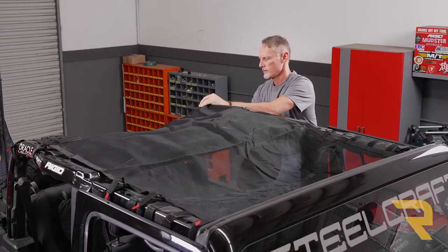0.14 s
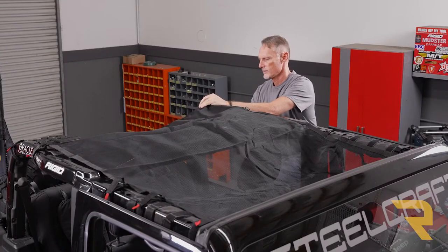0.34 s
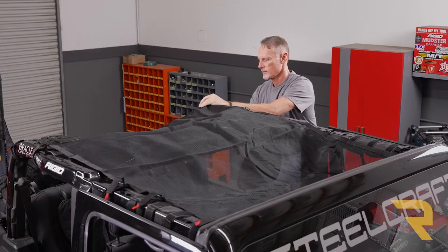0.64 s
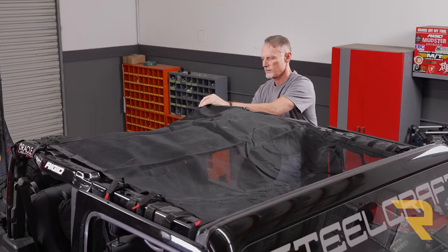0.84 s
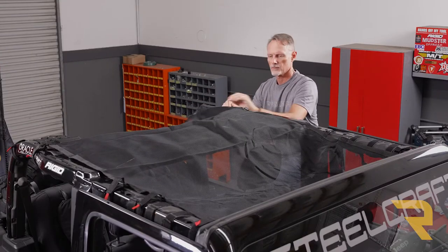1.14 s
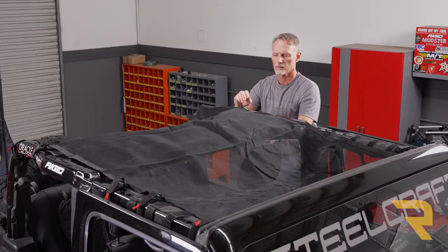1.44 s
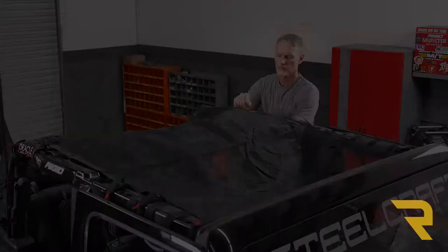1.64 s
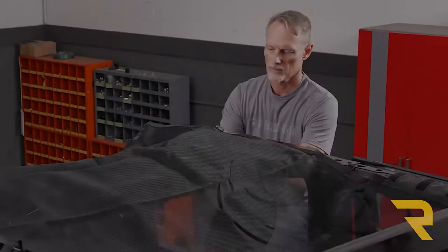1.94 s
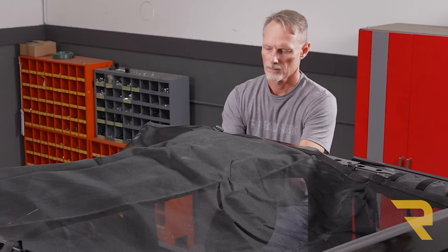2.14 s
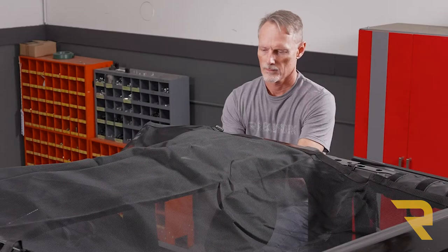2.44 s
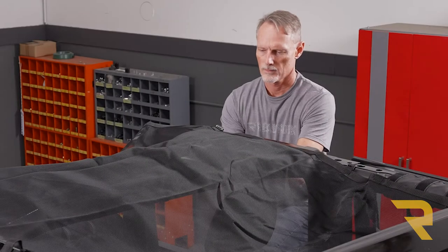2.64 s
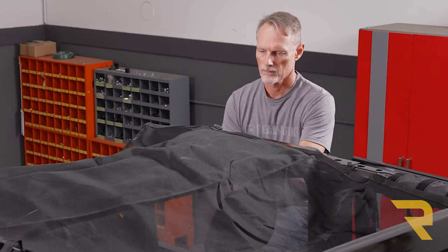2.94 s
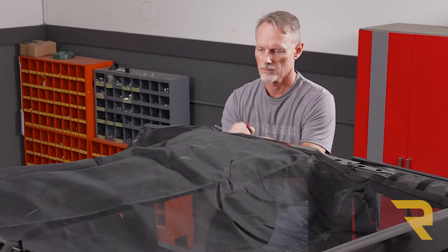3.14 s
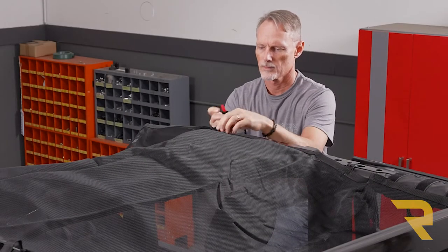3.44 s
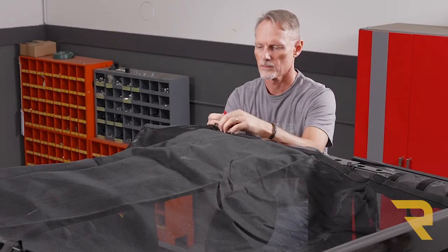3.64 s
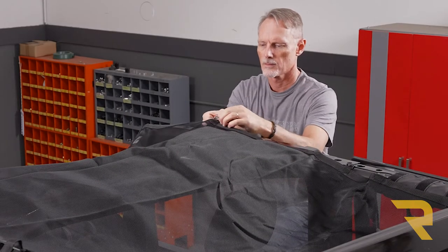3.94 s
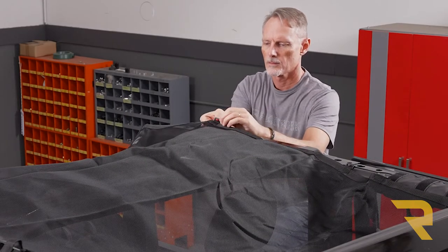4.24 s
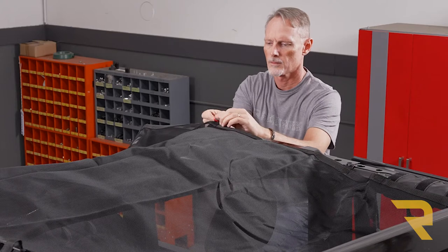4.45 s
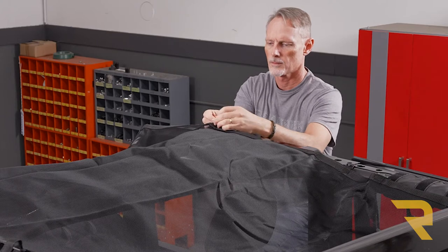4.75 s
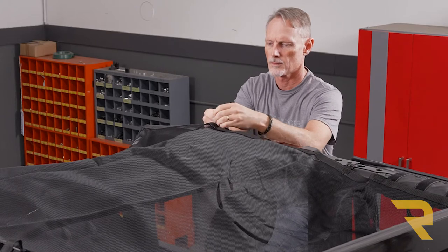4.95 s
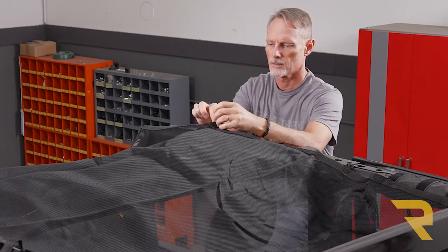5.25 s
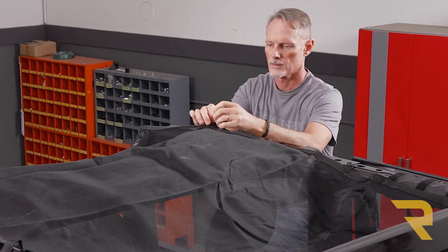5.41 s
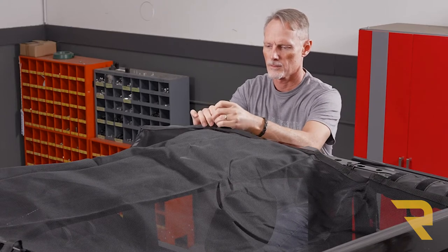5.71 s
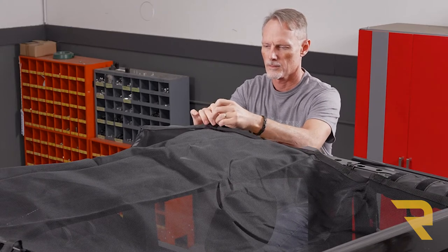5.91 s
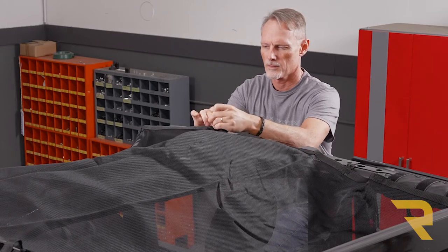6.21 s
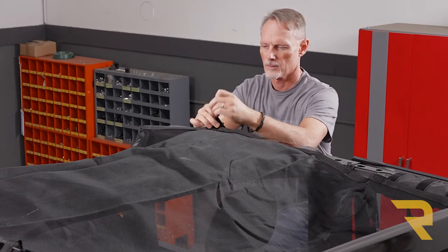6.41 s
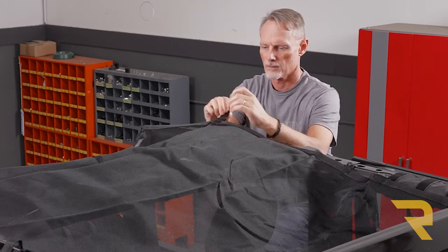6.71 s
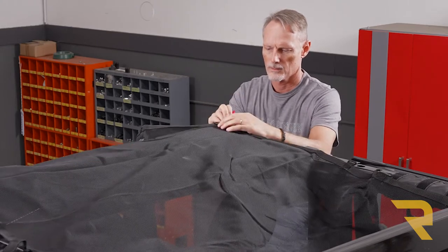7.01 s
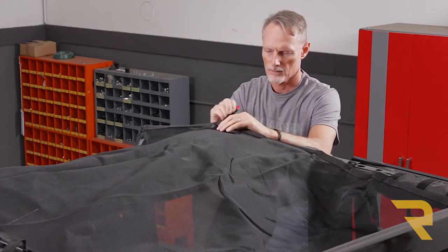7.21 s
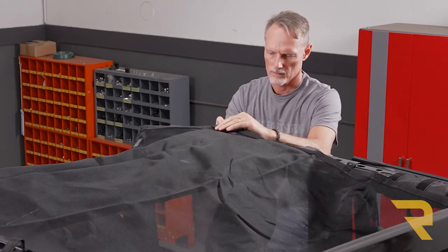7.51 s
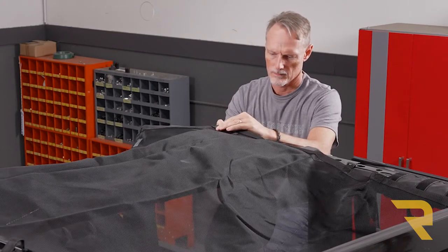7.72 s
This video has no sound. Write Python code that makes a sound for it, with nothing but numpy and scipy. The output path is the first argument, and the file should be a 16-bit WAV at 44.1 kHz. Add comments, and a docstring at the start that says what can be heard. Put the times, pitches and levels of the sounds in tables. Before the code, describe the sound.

A quiet workshop heard close in mono, with a faint low hum, still air and soft low lumps of body movement. From 0.1 to 0.6 seconds, light hook-and-loop crackles and bright little snaps mix with brushing cloth; scattered ticks and small tears continue to about 1.3. Around 1.7 to 2.2, fabric rubs and soft dull knocks sound on a hollow panel. Ticks quicken at 2.6, then the loudest event, a harsh, dense, bright rip, runs from about 2.68 to 2.83, trailing into strong cloth rustle. Short, lighter rasps follow at 3.35 and 3.65. From 4 to 6 it is sparse: faint rubbing, ticks and tiny fingertip taps. A sharp crackling snap comes at 6.24, with more handling and a muted bump near 6.85. Another crisp rip, weaker than the main one, hits at 7.23 to 7.31, then fine ticks fade out by 7.85.

```python
"""A quiet workshop, where hook-and-loop straps are ripped open by hand on a vinyl cover.
Each hook that lets go snaps at its own pitch; a rip is a dense hail of tiny snaps that tugs the cover.
Cloth rustles as fine rubbing grains and a dull wash; soft blows ring the modes of a hollow panel.
Fingertips tap stiff parts of the strap, and the shop hums faintly under low lumps of movement.
The sound is close, in one channel, with two kinds of room sound: a near echo and a faint short tail."""
import sys
import numpy as np
from scipy import signal
from scipy.io import wavfile
from scipy.ndimage import uniform_filter1d

SR = 44100
rng = np.random.default_rng(int(sys.argv[2]) if len(sys.argv) > 2 else 0)


def materialize(psi):
    """Save the field psi as 16-bit PCM at rate SR to the path in sys.argv[1].

    A 1-D psi becomes a single channel; in a 2-D psi each row is a channel.
    """
    bounded = np.clip(np.atleast_2d(psi).T, -1, 1)
    quanta = np.round(bounded * 32767).astype(np.int16)
    wavfile.write(sys.argv[1], SR, quanta)


N = 347067  # length in samples
TIME = np.arange(N) / SR  # seconds

# Colour of lightly released hooks. Each row: frequency in Hz, relative strength in dB per Hz.
STRAP_COLOUR = [(1500, -22), (2500, -10.5), (4200, -6.5), (6500, -5.5), (10000, -5), (14500, -4),
                (16200, -9.5)]


def gain_of(db):
    """Turns decibels into a plain multiplier for the sound wave."""
    return 10 ** (np.asarray(db) / 20)


def evened(x):
    """Scales a signal to an average power of 1."""
    return x / np.sqrt(np.mean(x ** 2) + 1e-20)


def add(mix, s, sound):
    """Adds a sound to the mix, starting at s seconds and cut where the mix ends."""
    part = mix[round(s * SR):][:len(sound)]
    part += sound[:len(part)]


def colour(x, points, size=8192):
    """Filters without looking ahead, to the given spectrum; white noise keeps its power."""
    f, db = np.transpose(points)
    hz = abs(np.fft.fftfreq(size, 1 / SR))
    log_gain = np.log(gain_of(np.interp(np.log(hz + 1), np.log(f + 1), db)))
    # the phase that goes with this spectrum puts the response as early as possible
    spectrum = np.exp(np.conj(signal.hilbert(log_gain)))
    response = np.fft.ifft(spectrum).real[:size // 2]
    return signal.oaconvolve(x, response / np.linalg.norm(response))[:len(x)]


def drift(seconds):
    """Makes a smooth random wander of power 1 that changes over the given time."""
    width = max(round(seconds * SR), 1)
    once = uniform_filter1d(rng.standard_normal(N), width)
    return evened(uniform_filter1d(once, width))


def hail(per_s, spread_db, clump_db, clump_s, ring_s, count=16):
    """Random tiny snaps in clumps, each ringing briefly at one of several pitches; power 1."""
    size_db = spread_db * np.minimum(rng.exponential(1, N), 3) + clump_db * drift(clump_s)
    size = gain_of(size_db) * (rng.random(N) < per_s / SR)
    kind = rng.integers(0, count, N)
    t = np.arange(256) / SR
    out = np.zeros(N)
    for k, hz in enumerate(np.geomspace(2500, 15500, count)):
        grain = np.exp(-t / ring_s) * (np.cos(2 * np.pi * hz * t) + 0.79 * rng.standard_normal(256))
        out += signal.oaconvolve(size * (kind == k), -grain)[:N]
    return evened(out), evened(size)


def swells(rows, rest_db):
    """Each movement speeds up, holds and slows again; the gains add over a resting level."""
    ends_db, fall_bend = -20, 0.49  # level one rise or fall time away; how the fall curves
    out = np.full(N, gain_of(rest_db))
    for s, rise_s, hold_s, fall_s, db in rows:
        first = max(round((s - 2 * rise_s) * SR), 0)
        near = slice(first, round((s + hold_s + 2 * fall_s) * SR))
        t = TIME[near] - s
        before = np.maximum(-t / rise_s, 0)
        after = np.maximum((t - hold_s) / fall_s, 0) ** fall_bend
        out[near] += gain_of(db + ends_db * (before + after))
    return out


def background():
    """Still air of the shop as coloured noise, a wavering hum and low lumps of movement."""
    # Colour of the still air. Each row: frequency in Hz, relative strength in dB per Hz.
    air_colour = [(20, -17.5), (60, 2), (124, 0.5), (211, -4), (474, -12.5), (531, -29), (1230, -25),
                  (2150, -23.5), (10900, -27.5), (14100, -36), (16200, -43)]
    # Tones of the hum. Each row: frequency in Hz, level in dB around which it wavers.
    hum_tones = [(118.4, -68.5), (258.4, -76.5)]
    # Arms and body moving near the microphone. Each row: time in seconds, level in dB before wavering.
    bumps = [(.16, -53), (.45, -55.5), (1., -57), (1.23, -58), (1.42, -58), (1.75, -64.5), (2.73, -47.5),
             (2.95, -58), (3.55, -62.5), (3.97, -58.5), (5.2, -61), (6.25, -50.5), (6.6, -60),
             (6.77, -53.5), (7.25, -45), (7.55, -59)]
    rise_s, hold_s, fall_s, still_db = 0.11, 0.0069, 0.2, -73.5  # shape of each bump, level between them

    air = gain_of(-64.5) * colour(rng.standard_normal(N), air_colour)
    hum = np.zeros(N)
    for hz, db in hum_tones:
        level = gain_of(db + 4.1 * drift(0.18))
        hum += level * np.sin(2 * np.pi * hz * TIME + 1.0 * drift(0.036))
    low_colour = [(10, -10.5), (25, -6.0), (70, -1.5), (140, -9), (400, -59.5)]  # Hz, dB per Hz
    lumps = colour(rng.standard_normal(N), low_colour)
    movement = swells([(s, rise_s, hold_s, fall_s, db) for s, db in bumps], still_db)
    return air + hum + lumps * movement * gain_of(0.93 * drift(0.04))


def rustle():
    """Fibres rub: very dense fine grains whose colour wanders with the fold, and a duller wash."""
    # Colour of the rubbing cloth. Each row: frequency in Hz, relative strength in dB per Hz.
    cloth_colour = [(880, -59), (1500, -29.5), (1890, -19.5), (2260, -14.5), (4350, -10), (6420, -8),
                    (9180, -5.5), (14800, -6.5), (16200, -10.5)]
    # Colour of the shifting folds. Each row: frequency in Hz, relative strength in dB per Hz.
    fold_colour = [(150, -19), (400, 1), (1200, -3.5), (3000, -15), (5000, -35.5)]
    # Dull wash of folds shifting in the cover. Each row: time in seconds, level in dB before wavering.
    shifting = [(0.0, -69), (1.62, -67.5), (1.92, -64), (2.532, -67.5), (2.953, -60), (3.464, -71),
                (4.214, -69.5), (5.23, -67), (5.952, -71), (6.258, -64), (6.483, -67.5), (6.74, -65),
                (6.86, -56), (7.108, -69.5), (7.307, -58.5), (7.868, -74.5)]
    # Hand strokes over the cloth. Each row: start of full speed in seconds, rise in seconds,
    # hold in seconds, fall in seconds, level in dB.
    strokes = [(.03, .06, 0.0058, 0.037, -62.5), (.1, 0.03, 0.082, 0.11, -55.5),
               (.3, 0.089, 0.023, 0.047, -74), (.565, 0.013, 0.035, 0.1, -55.5),
               (.79, 0.28, 0.013, 0.26, -64), (1.16, 0.27, 0.11, 0.11, -60),
               (1.685, 0.0068, 0.07, 0.063, -61.5), (1.8, 0.036, 0.061, 0.11, -56),
               (2.09, 0.096, 0.068, 0.1, -58.5), (2.22, .06, 0.034, 0.028, -57),
               (2.39, 0.038, 0.085, 0.065, -54.5), (2.53, 0.087, 0.15, 0.16, -70),
               (2.82, 0.19, 0.13, 0.29, -45), (3.1, 0.14, 0.056, 0.22, -62),
               (3.535, 0.015, 0.036, 0.064, -48), (3.6, 0.024, 0.028, 0.012, -60),
               (3.33, 0.025, 0.064, 0.018, -52), (3.77, 0.036, 0.12, 0.085, -62),
               (4.43, 0.08, 0.15, 0.092, -66), (4.86, 0.03, 0.011, 0.04, -63.5),
               (5.02, 0.014, 0.012, 0.072, -50.5), (5.17, 0.12, 0.035, 0.17, -61),
               (5.365, 0.01, 0.0094, 0.014, -62), (5.53, 0.043, 0.084, 0.06, -62),
               (5.68, 0.023, 0.021, .06, -68.5), (5.82, 0.057, 0.024, 0.027, -60.5),
               (6.072, 0.0087, 0.0096, 0.026, -53), (6.3, 0.16, 0.11, 0.23, -57),
               (6.58, 0.0074, 0.064, 0.19, -58.5), (6.76, 0.015, 0.025, 0.14, -59.5),
               (6.88, 0.092, 0.063, 0.27, -60.5), (7.05, .06, 0.013, 0.044, -64),
               (7.3, 0.12, 0.082, 0.27, -56), (7.48, 0.065, 0.027, 0.13, -65)]
    resting_db = -75

    fine = hail(per_s=20000, spread_db=1.5, clump_db=.8, clump_s=.004, ring_s=.0004)[0]
    # stray hooks catching
    ticks = hail(per_s=220, spread_db=3.2, clump_db=2.5, clump_s=0.04, ring_s=.0006)[0]

    # random patches in time and pitch make the colour wander
    z = signal.stft(colour(fine, cloth_colour), nperseg=256)[2]
    patches = rng.standard_normal(z.shape[::-1]).T
    for _ in range(2):
        patches = uniform_filter1d(patches, size=6, axis=0)
        patches = uniform_filter1d(patches, size=30, axis=1)
    fine = signal.istft(z * gain_of(2.2 * evened(patches)), nperseg=256)[1][:N]

    wash_db = 0.47 * drift(0.0058) + np.interp(TIME, *np.transpose(shifting))
    dull = colour(rng.standard_normal(N), fold_colour) * gain_of(wash_db)
    rubbing = evened(fine) + gain_of(-2.5) * evened(colour(ticks, STRAP_COLOUR))
    return swells(strokes, resting_db) * rubbing + dull


def slips():
    """The peel sticks and slips: hooks give way in uneven jerks, sudden and dying fast; power 1."""
    slips_per_s, slip_s, spread_db = 250, 0.001, 2  # rate before it wanders, fade time, size spread
    pace = gain_of(4.0 * drift(.003))
    jerks = np.diff(np.floor(np.cumsum(pace) * slips_per_s / SR), prepend=0)
    sizes = gain_of(spread_db * np.minimum(rng.standard_normal(N), 1))
    return evened(signal.lfilter([1], [1, -np.exp(-1 / (slip_s * SR))], jerks * sizes))


def rips():
    """Rows of hooks tear loose: bright hail, and each release tugs the cover."""
    # One list for each rip. Each row: time in seconds, pull level in dB,
    # share in the cover's low body in dB against the pull.
    rip_curves = [
        [(0.08, -61, -15), (0.102, -44, -11), (0.112, -61, -6), (0.21, -46, -24)],
        [(0.499, -49, -16), (0.541, -67, -2), (0.659, -76, 5)],
        [(2.6935, -21.5, -11), (2.717, -14, -11), (2.7215, -26, -17), (2.727, -18.5, -2.5), (2.7305, -28, -16),
         (2.738, -19.5, -17), (2.746, -17.5, -12), (2.766, -17, -14.5), (2.783, -12.5, -19),
         (2.798, -16.5, -10), (2.806, -16.5, -8.5), (2.814, -19, -14.5), (2.822, -38, -29)],
        [(3.308, -62, -19), (3.352, -34.5, -24), (3.392, -41.5, -33), (3.398, -55.5, -8)],
        [(3.605, -56, -26), (3.64, -38.5, -31), (3.657, -51, -13)],
        [(6.228, -62, 9), (6.236, -19, -19), (6.242, -23, -21), (6.306, -43.5, -8), (6.316, -59, -2),
         (6.35, -52, -11)],
        [(6.844, -57, 7), (6.852, -38, -16), (6.928, -58, -16)],
        [(7.224, -68, -15), (7.236, -50, -8), (7.273, -23, -11.5), (7.284, -29, -9), (7.297, -26.5, -18.5),
         (7.327, -50.5, -5), (7.363, -42, -59)],
    ]
    # Short tears of a few hooks at once. Each row: start in seconds, level in dB, fade length in seconds.
    tears = [(0.0993, -30.5, 0.005), (0.127, -38, 0.006), (0.78, -34, 0.0031), (1.179, -41.5, 0.0066),
             (1.219, -44, 0.0063), (1.2272, -32, 0.0048), (2.6875, -12, 0.0017), (2.7115, -20, 0.0022),
             (2.721, -17, 0.0022), (2.7306, -10, 0.0027), (2.766, -22, 0.0025), (2.801, -20, 0.0036),
             (2.808, -14, 0.0022), (2.873, -34, 0.015), (2.9302, -33, 0.015), (3.012, -43.5, 0.015),
             (3.256, -45.5, 0.026), (5.015, -43, 0.026), (5.246, -45, 0.0032), (5.444, -34.5, 0.0014),
             (6.238, -27, 0.0034), (6.2965, -45, 0.0018), (6.303, -25, 0.0036), (6.579, -43.5, 0.011),
             (7.2327, -28.5, 0.0044), (7.245, -34, .004), (7.253, -30, 0.0028), (7.2582, -26, 0.0024),
             (7.271, -24, 0.003), (7.289, -25, .0015), (7.2923, -22, 0.0015), (7.298, -15, 0.0021),
             (7.3077, -24, 0.0026)]
    # Colour of hooks pulled hard. Each row: frequency in Hz, relative strength in dB per Hz.
    hook_colour = [(1180, -51), (2000, -12), (2530, -7), (2810, -13.5), (3320, -1.5), (4250, -3.5),
                   (6870, 0), (10200, 5), (15100, 3.5), (16200, -20)]
    # A light pull frees only the hook tips. Each row: frequency in Hz, relative strength in dB per Hz.
    peel_colour = [(2000, -27.5), (4000, -13), (6000, -5), (12000, -0.5), (16200, -8.5)]
    # Low body of the cover. Each row: frequency in Hz, relative strength in dB per Hz.
    cover_colour = [(53, -44.5), (90, -3), (379, -2.5), (789, 0), (1210, 1), (2700, -7.5), (3900, -40.5)]
    between_hard, between_light = 0.76, 0.28  # steady part of the hail between jerks

    bright, tugs = hail(per_s=5000, spread_db=-1.0, clump_db=1.28, clump_s=0.00069, ring_s=0.0002)
    jerks = slips()
    hard = evened(colour(bright * (between_hard + jerks), hook_colour))
    light = evened(colour(bright * (between_light + jerks), peel_colour))
    low = evened(colour((tugs.mean() - tugs) * (between_hard + jerks), cover_colour))

    pull, tear, body = np.zeros((3, N))
    for rows in rip_curves:
        s, db, low_db = np.transpose(rows)
        t = np.arange(s[0], s[-1], 1 / SR)
        edge = signal.windows.tukey(len(t), .01)  # softens both ends
        add(pull, s[0], edge * gain_of(np.interp(t, s, db)))
        add(body, s[0], edge * gain_of(np.interp(t, s, db + low_db)))
    for s, db, length in tears:
        u = np.arange(round(5 * length * SR)) / SR / length
        burst = gain_of(db) * np.minimum(5 * u, 1) * np.exp(-u ** 2)
        add(tear, s, burst)
        add(body, s, gain_of(-18.5) * burst)

    # only a hard pull shakes the wider strap
    share = np.clip(uniform_filter1d(pull, 900) / gain_of(-23.5), 0, 1)
    pulled = pull * (share * hard + (1 - share) * light)
    torn = tear * evened(colour(bright, peel_colour))
    return pulled + torn + body * low


def strap_ring(x):
    """The taut free end of the strap adds a broad resonance that moves with its free length."""
    # Ring as the strap is pulled and rubbed. Each row: time in seconds, frequency in Hz,
    # level in dB against the direct sound.
    ring_path = [(2.2, 4490, -7), (2.74, 4500, 1), (2.765, 4700, -3), (2.775, 9500, -2), (2.82, 10400, -26),
                 (3.3, 5200, -10), (3.7, 4800, -2), (4.399, 4490, -6.5), (5.05, 4314, -9.5),
                 (7.3, 6760, -1)]
    width_hz = 730
    s, hz, db = np.transpose(ring_path)
    turn = np.exp(2j * np.pi * np.cumsum(np.interp(TIME, s, hz)) / SR)
    r = np.exp(-np.pi * width_hz / SR)
    # shift the moving pitch down to zero, smooth there, and shift back
    smoothed = signal.lfilter([1 - r], [1, -r], x / turn)
    return x + gain_of(np.interp(TIME, s, db)) * 2 * (turn * smoothed).real


def snaps():
    """A hook lets go: a ringing crack, a dying fizz, and a quick flick and slow heave of the cover."""
    # Single hooks letting go. Each row: start in seconds, level in dB before colouring,
    # ring frequency in Hz, tug on the cover in dB against that level.
    snap_rows = [(0.09, -23.5, 7600, -29), (0.1442, -21, 6300, -33), (0.1643, -8, 9650, -19),
                 (0.186, -14.5, 7200, -46), (0.202, -20, 7940, -38), (0.228, -26, 15900, -33),
                 (0.266, -35.5, 7600, -35), (0.299, -28, 7960, -34), (0.32, -27, 8200, -54),
                 (0.329, -28, 10050, -20), (0.3572, -32.5, 8000, -28), (0.3902, -21, 10600, -35),
                 (0.436, -35, 11100, -40), (0.459, -25, 9500, -20), (0.4892, -16, 10200, -13.5),
                 (0.5006, -29, 7640, -44), (0.5186, -17, 10260, -22), (0.5665, -25, 9900, -34),
                 (0.6277, -19.5, 11200, -18), (0.667, -26, 11750, -24), (0.8019, -27, 10500, -19),
                 (0.9075, -17, 5770, -25), (0.95, -31.5, 7300, -30), (0.958, -25.5, 9600, -22.5),
                 (0.9718, -20, 4800, -46), (0.979, -17, 11300, -30), (0.9996, -17.5, 10950, -13),
                 (1.1523, -27.5, 7300, -17), (1.1595, -23.5, 11700, -16), (1.1945, -24, 10500, -22),
                 (1.251, -42, 8000, -34), (1.7121, -25.5, 11700, -14.5), (1.743, -33.5, 4950, -3.5),
                 (2.0099, -29, 6100, -9.5), (2.143, -19, 12400, -10.5), (2.5336, -29, 4000, -45),
                 (2.612, -22.5, 4340, -31), (2.6401, -16.5, 8500, -30), (2.6634, -22, 9250, -29),
                 (2.6712, -13, 12200, -13), (2.6789, -2.5, 6450, -20), (2.968, -25, 15100, -30),
                 (3.0679, -21, 9670, -16.5), (3.337, -22, 13500, -30), (3.3519, -14.5, 9800, -14.5),
                 (3.3645, -27, 10800, -33), (3.3869, -17.5, 7600, -43), (3.5326, -29.5, 4170, -7.5),
                 (3.539, -17, 13700, -28.5), (3.648, -19.5, 12400, -34), (3.696, -30.5, 12200, -14.5),
                 (4.257, -40, 11930, -29.5), (4.623, -35.5, 10600, -33), (4.744, -24, 10400, -35.5),
                 (4.9693, -28, 9400, -37), (5.3623, -22.5, 11440, -26), (5.3936, -24.5, 5150, -16.5),
                 (5.448, -23, 4860, -28), (5.5243, -31.5, 4900, -14), (5.8325, -27.5, 6970, -18.5),
                 (6.073, -29, 11200, -12), (6.2219, -25, 13400, -43.5), (6.236, -5, 11400, -20.5),
                 (6.282, -13, 12300, -51), (6.3049, -13.5, 9300, -10.5), (6.321, -13.5, 8240, -18),
                 (6.3362, -12, 14700, -28), (6.534, -25.5, 7070, -11), (6.611, -21.5, 12300, -36),
                 (6.7174, -19.5, 8450, -9.5), (6.754, -25.5, 8440, -8), (6.77, -19.5, 8360, -14),
                 (6.852, -21, 7460, -13), (6.8697, -18, 13000, -28), (6.895, -17.5, 12900, -25),
                 (6.921, -22.5, 11230, -29), (7.0912, -27.5, 13600, -47), (7.1178, -30, 8000, -37),
                 (7.227, -23, 6260, -20), (7.2348, -12.5, 12600, -12), (7.315, -21, 11500, -35),
                 (7.32, -13, 6760, -36), (7.337, -22, 8900, -28), (7.345, -26, 10000, -25),
                 (7.363, -20, 7240, -35), (7.377, -28, 10000, -35), (7.388, -25, 13500, -28),
                 (7.468, -26, 12000, -34), (7.4844, -26, 12200, -42), (7.5081, -16, 11660, -19),
                 (7.5175, -20, 12740, -54), (7.5662, -19.5, 11940, -30), (7.5993, -24.5, 7300, -53),
                 (7.7458, -30.5, 6750, -12.5), (7.7638, -23, 12100, -28), (7.8124, -20, 5150, -46),
                 (7.8261, -19.5, 8040, -16)]
    bright, low = np.zeros((2, N))
    t = np.arange(1024) / SR
    flick, heave = t / .0001, t / 0.002
    tug = -1.6 * flick * (1 - 0.27 * flick) * np.exp(1 - flick) + 0.2 * heave * np.exp(1 - heave)
    fizz_fade = gain_of(-8.0 - 60 * t / 0.0029) + gain_of(-19.0 - 60 * t / 0.024)
    for (s, db, hz, tug_db), noise in zip(snap_rows, rng.standard_normal((len(snap_rows), 1024))):
        tone = -np.sin(2 * np.pi * hz * t)
        near = 1.88 * uniform_filter1d(noise, size=5) * tone  # noise gathered around the pitch
        fizz = (near + 0.23 * noise) * fizz_fade
        crack = 0.65 * tone * gain_of(-60 * t / 0.0022)
        add(bright, s, gain_of(db) * (crack + fizz) * np.minimum(t / 0.00016, 1))
        add(low, s, gain_of(db + tug_db) * tug)
    return colour(bright, STRAP_COLOUR) + low


def knocks():
    """A soft blow rings the panel's modes, detuned by where it lands; longer blows are duller."""
    # Knocks on the panel. Each row: start in seconds, average (rms) level of the first ring in dB,
    # blow length in seconds, rise in seconds, pitch factor of the spot struck.
    knock_rows = [(0.803, -60, 0.0024, 0.0087, 1.15), (1.886, -49, 0.003, 0.0099, 1.2),
                  (1.929, -46.5, 0.0009, 0.0018, 0.86), (2.145, -43, 0.00043, 0.0018, 0.95),
                  (2.941, -53.5, 0.00051, 0.00091, 1.06), (5.27, -58, 0.00048, 0.0014, .95),
                  (6.634, -59, 0.000095, 0.00034, 1.12), (6.85, -53.5, 0.00087, 0.0047, 0.84)]
    # Modes of the hollow panel. Each row: frequency in Hz before the spot's factor,
    # relative level in dB, time to fall by 60 dB in seconds.
    panel = [(198.4, -5.5, 0.26), (254, 0, 0.23), (347, -2, 0.13), (499, 4.5, 0.092), (570, 12, 0.044),
             (705, 8.5, 0.056), (910, 11, 0.024), (1190, 14, 0.019)]
    sag_share, sag_s = .25, 0.025  # how sharp a knock starts, and how fast it settles

    out = np.zeros(N)
    t = np.arange(SR // 4) / SR
    # the pitch drops as the stretched panel relaxes
    sag = t + sag_share * sag_s * (1 - np.exp(-t / sag_s))
    chances = rng.random((len(knock_rows), len(panel), 2))
    for (s, db, blow_s, rise_s, spot), chance in zip(knock_rows, chances):
        ring = np.zeros(len(t))
        for (hz, mode_db, t60), (detune, phase) in zip(panel, chance):
            mode_hz = hz * spot * (1 + 0.037 * (detune - .5))
            ring += gain_of(mode_db - 60 * t / t60) * np.sin(2 * np.pi * (mode_hz * sag + phase))
        # the loose cover rattles on it
        ring *= 1 + 0.15 * evened(uniform_filter1d(rng.standard_normal(len(t)), size=120))
        blow = t[:400] * np.exp(-t[:400] / max(blow_s / 4, 1e-5))
        sound = signal.oaconvolve(ring * (1 - np.exp(-t / rise_s)), blow)
        add(out, s, gain_of(db) * sound / np.std(sound[:1200]))
    return out


def taps():
    """Each fingertip tap on a stiff part of the strap is one short, slightly rough ring."""
    # Fingertip taps. Each row: start in seconds, level in dB before roughening, ring frequency in Hz.
    tap_rows = [(1.251, -37.5, 3930), (1.284, -41.5, 3430), (2.0101, -43.5, 2350), (5.3937, -39, 1350),
                (5.448, -42.5, 1300)]
    t60 = 0.014  # seconds to fall by 60 dB
    out = np.zeros(N)
    t = np.arange(1024) / SR
    for (s, db, hz), noise in zip(tap_rows, rng.standard_normal((len(tap_rows), 1024))):
        rough = 1 + 0.73 * evened(uniform_filter1d(noise, size=20))
        add(out, s, gain_of(db - 60 * t / t60) * rough * np.sin(2 * np.pi * hz * t))
    return out


def room(x):
    """A near echo repeats the sound, then a faint diffuse tail of fading noise follows."""
    # Echo off the cover and the body. Each row: delay in seconds, level in dB.
    echoes = [(.0026, -25.5)]
    tail_db, t60 = -20.5, 0.11  # tail level, seconds to fall by 60 dB
    t = np.arange(SR // 2) / SR
    tail = rng.standard_normal(len(t)) * gain_of(-60 * t / t60) * (t > .008)
    response = gain_of(tail_db) * tail / np.linalg.norm(tail)
    response[0] = 1  # the direct sound
    for s, db in echoes:
        add(response, s, gain_of([db]))
    return signal.fftconvolve(x, response)[:N]


def scene():
    """Rips, snaps, taps and knocks sound in the room; rustle and background stay direct."""
    struck = room(strap_ring(rips()) + snaps() + taps() + knocks())
    return (struck + strap_ring(rustle()) + background())[None]


def record(dry):
    """The loudest peaks round off softly; then the highest treble is cut."""
    overload, edge_hz = .9, 16050  # ceiling of the wave, top of the band
    rounded = overload * np.tanh(dry / overload)
    band = signal.firwin(511, edge_hz, window=("kaiser", 9), fs=SR)
    return signal.oaconvolve(rounded, band[None], "same")


dry = scene()
out = record(dry)
materialize(out)
```